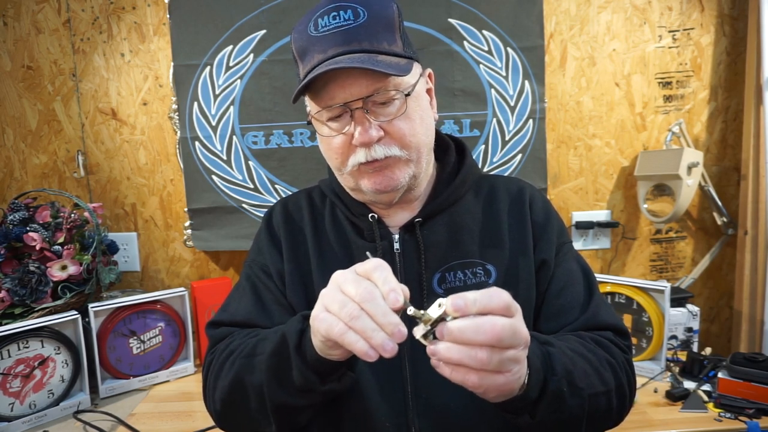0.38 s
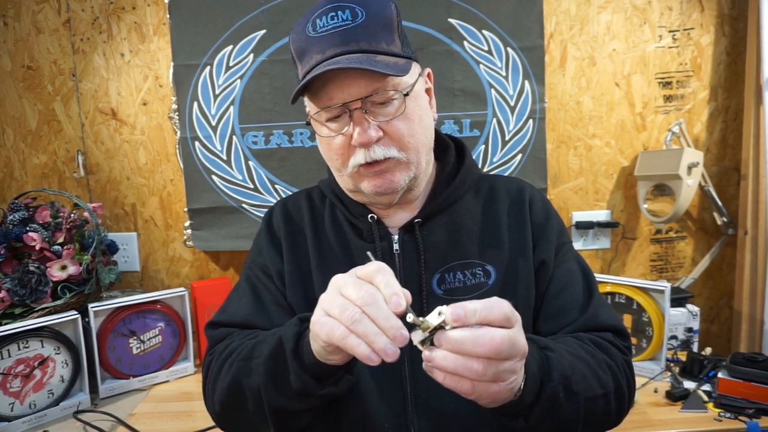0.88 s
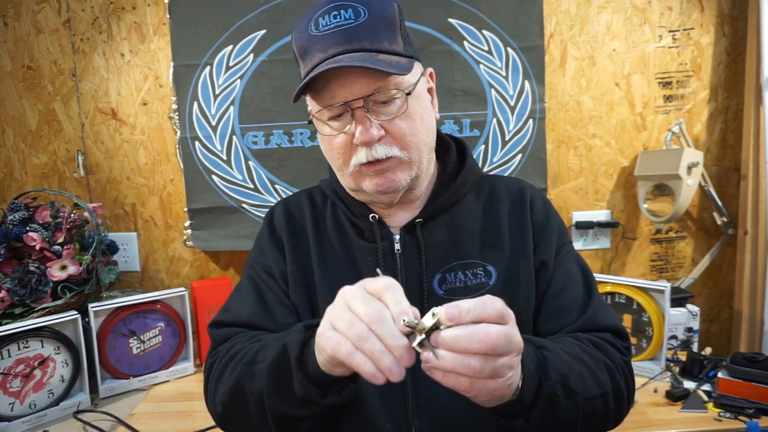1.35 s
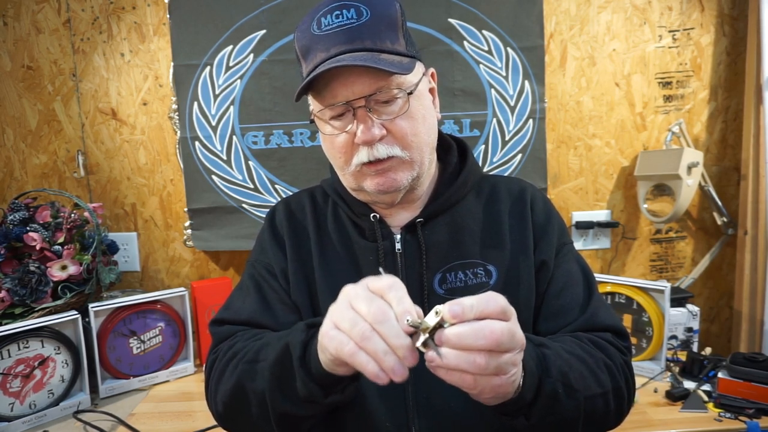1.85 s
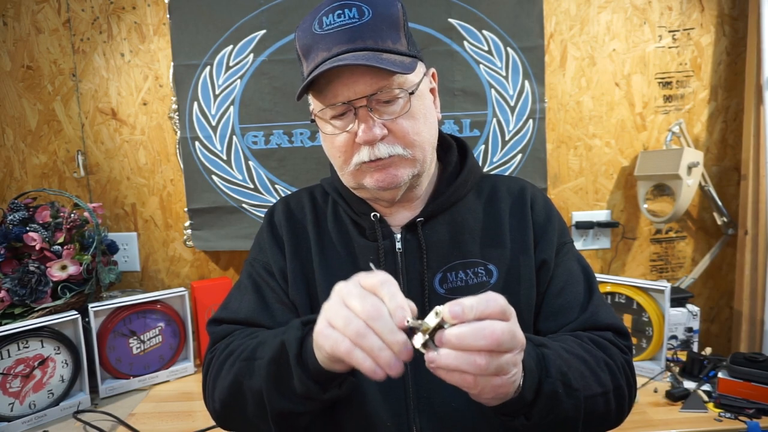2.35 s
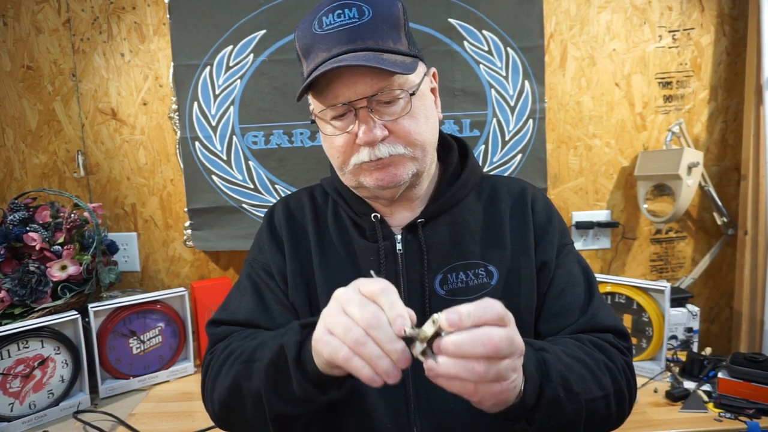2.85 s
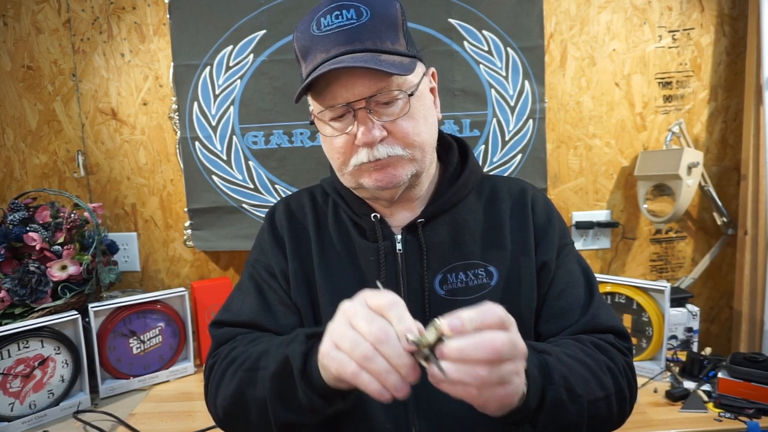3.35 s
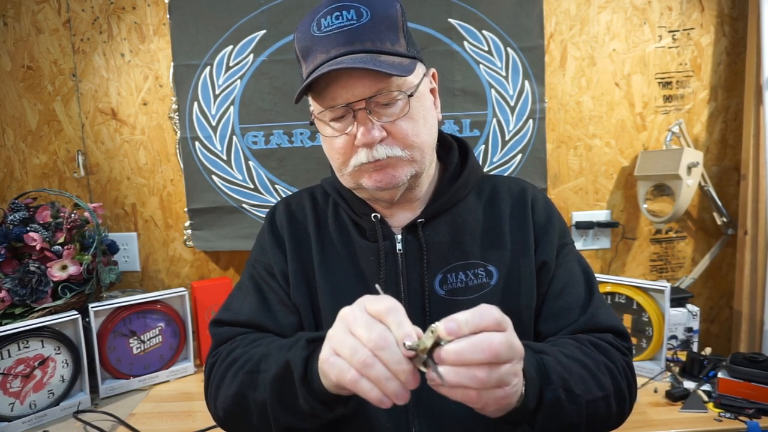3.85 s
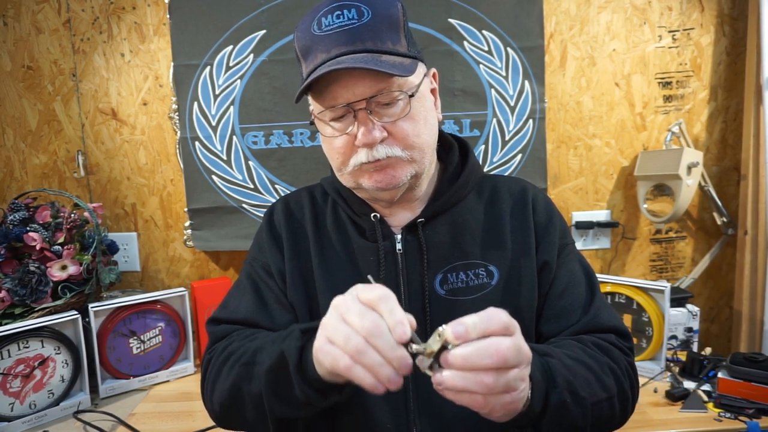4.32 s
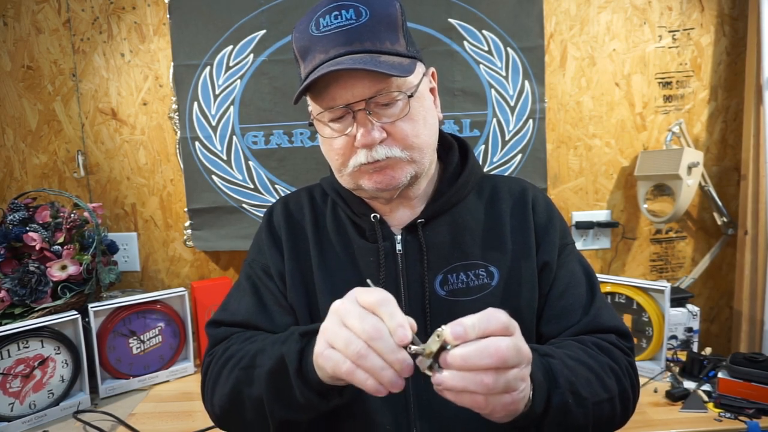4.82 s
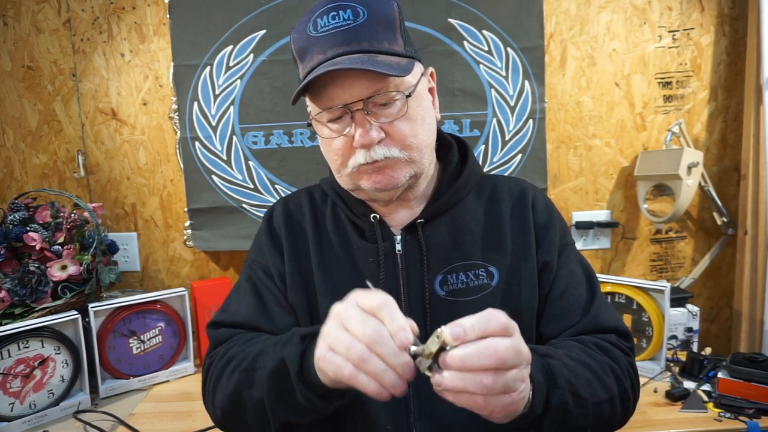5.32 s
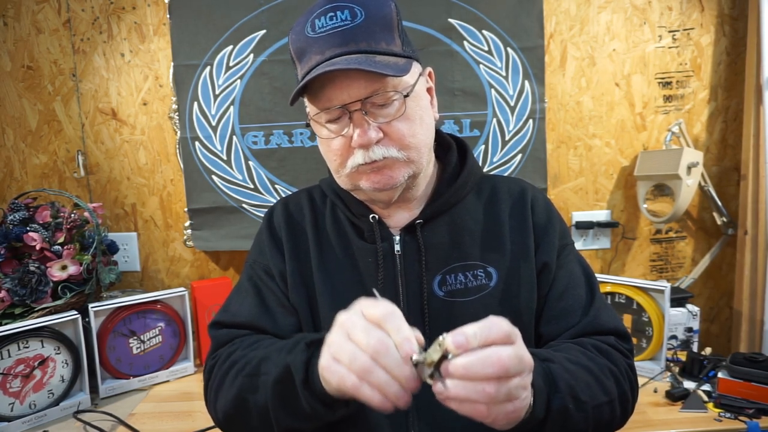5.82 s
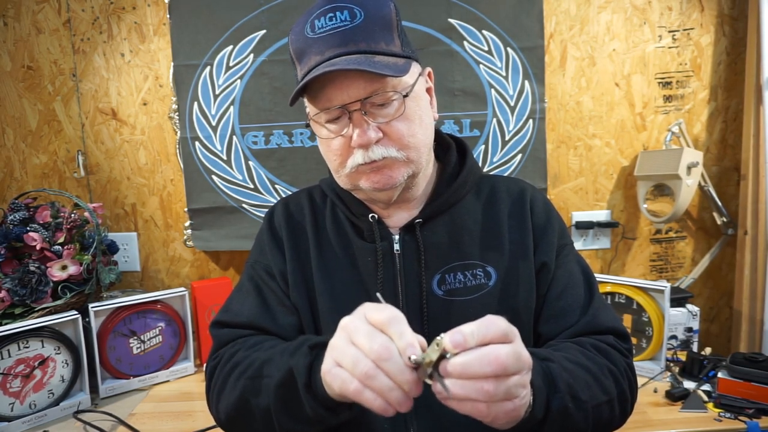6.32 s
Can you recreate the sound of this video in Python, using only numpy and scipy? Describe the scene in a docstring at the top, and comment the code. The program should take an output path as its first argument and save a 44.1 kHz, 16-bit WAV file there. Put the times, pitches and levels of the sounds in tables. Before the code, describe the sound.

A fine steel file works on a small metal contact held in the hand, heard close and mostly on the right, with a short wooden workshop reverberation. At 0.1 s a single scratchy stroke bites with sharp ticks; a faint touch follows at 0.25, then near quiet until light contact at 0.9. From 1.0 s quick, even pull and push strokes run at about seven a second, dry, bright and gritty, each about a tenth of a second or less. They pause around 3.4-3.7 s with tiny clicks, then resume a little stronger until the end at about 6.6 s. Brief high squeaks ring at 2.5 and 3.2 s and crowd in after 3.8, piercing near 5.3, 5.55 and 5.9. A soft sleeve drag and dull thump come at 5.7; the strongest rasp is at 6.1. Faint hiss, room air, low buzz and distant motor hum continue underneath.

```python
"""Filing small metal parts

A fine steel file rasps in quick push and pull strokes over small metal contacts held in the hand, in a plywood
workshop. Dense random clicks excite scratch, blade and contact resonances; slips add a squealing tone with its octave.
Dying noise bursts tick and knock: sharp bites as strokes begin, light touches, one thump. A sleeve drags once.
The right microphone is much nearer than the left. Shaped noise makes hiss and room air, sines make a far motor
and the recorder's frame-rate buzz."""
import sys
import numpy as np
from scipy import signal
from scipy.fft import rfft, irfft, next_fast_len
from scipy.io import wavfile
from scipy.ndimage import map_coordinates

SR = 44100
rng = np.random.default_rng(int(sys.argv[2]) if len(sys.argv) > 2 else 0)


def persist_wave(psi):
    """Save psi, clipped to +-1, as 16-bit WAV."""
    counts = np.round(np.clip(psi, -1, 1) * 32767).astype(np.int16)
    wavfile.write(sys.argv[1], SR, np.atleast_2d(counts).T)


def field_ratio(decibels):
    """Amplitude ratio for a level in dB (20 dB per decade); scalars and array-likes work."""
    return 10 ** (np.asarray(decibels, dtype=float) / 20)


N = 294588  # samples in the scene


def unit(x):
    """Scale to rms 1."""
    return x / np.sqrt(np.mean(x ** 2) + 1e-20)


def along(points, hz):
    """Interpolate (frequency_hz, value) points on a log frequency axis."""
    f, v = np.transpose(points)
    return np.interp(np.log(hz + 1), np.log(f + 1), v)


def filtered(x, response):
    """Multiply the spectrum of x by a response, real or complex, given as a function of frequency."""
    n = x.shape[-1]
    padded = next_fast_len(n + 4096)
    hz = np.fft.rfftfreq(padded, 1 / SR)
    return irfft(rfft(x, padded) * response(hz), padded)[..., :n]


def wobble(n, rate):
    """A smooth random curve over n samples, with rate knots a second."""
    knots = rng.standard_normal(int(n * rate / SR) + 4)
    return map_coordinates(knots, [np.arange(n) * rate / SR])


def resonant(x, modes, detune, scatter_db):
    """Ring x through modes; as the contact point travels, each is driven now harder, now softer."""
    hz, width, db = np.transpose(modes)[..., None]
    hz = hz * (1 + detune * rng.standard_normal(hz.shape))
    travel = np.array([wobble(len(x), 33.7) for _ in modes])
    drive = x * field_ratio(db + scatter_db * travel)
    rings = filtered(drive, lambda f: 1j * f * width / (hz * hz - f * f + 1j * f * width))
    signs = (-1.) ** np.arange(len(modes))  # neighbouring modes add in opposite polarity
    return signs @ rings


def swell(t, peak, rise, fall, edge_db, curve):
    """Gain 1 at the peak, edge_db down one rise before and one fall after; a higher curve is flatter on top."""
    distance = np.abs(np.where(t < peak, (peak - t) / rise, (t - peak) / fall))
    return field_ratio(-edge_db * distance ** curve)


def add(track, s, x):
    """Mix x into the track from s seconds, trimming whatever falls outside."""
    at = round(s * SR)
    part = track[max(at, 0):][:len(x) + min(at, 0)]
    part += x[max(-at, 0):][:len(part)]


def grains(n, spiky_db):
    """Dense friction noise: every sample is a click scaled by a random size, capped so none towers."""
    size = np.minimum(rng.exponential(size=n), 5)
    return unit(rng.standard_normal(n) * field_ratio(spiky_db * size))


def tone(hz, db, lag=0):
    """A steady sine of db rms, lag in radians."""
    t = np.arange(N) / SR
    return np.sqrt(2) * field_ratio(db) * np.cos(2 * np.pi * hz * t + lag)


# Hiss spectrum, shape only: frequency_hz, density_db (relative, per Hz)
HISS_SPECTRUM = [(10, 13), (30, 10), (80, 5), (300, -2.5), (1500, -9), (4000, -4), (11000, -4.5)]


def recorder_hiss():
    """Noise unrelated in the two channels, shaped like the recorder's hiss."""
    hiss = filtered(rng.standard_normal((2, N)), lambda hz: field_ratio(along(HISS_SPECTRUM, hz)))
    return field_ratio(-47) * unit(hiss)


# Room air spectrum, shape only: frequency_hz, density_db (relative, per Hz)
AIR_SPECTRUM = [(40, -12), (120, -3), (250, -5), (440, -0.5), (800, -3), (1500, -7), (3000, -16.5),
                (6000, -42)]


def room_air():
    """Shaped noise, stronger at the right; the left gets a little of it and a noise of its own."""
    noise = rng.standard_normal((2, N))
    near, far = unit(filtered(noise, lambda hz: field_ratio(along(AIR_SPECTRUM, hz))))
    return field_ratio(-47) * np.array([field_ratio(-18.5) * near + field_ratio(-10) * far, near])


# Far motor's tones: pitch_hz, level_db (rms before the channel gains)
MOTOR_TONES = [(147.4, -69), (294.5, -70.5), (442, -64)]


def far_motor():
    """Steady tones whose levels wander separately, 6 dB down at the left and 3 dB up at the right."""
    motor = sum(tone(hz, db) * field_ratio(2.8 * wobble(N, 2.87)) for hz, db in MOTOR_TONES)
    return motor * field_ratio([[-6], [3]])


# Frame buzz: multiple (of the frame rate), level_db (rms)
BUZZ_PARTIALS = [(.5, -73), (1, -47), (2, -54), (3, -63), (4, -65), (5, -86), (6, -72)]


def frame_buzz():
    """Partials of the frame rate, common to both channels; phase lags smear each pulse in time."""
    frame_hz, smear_rad = 29.97, .93  # the lag grows with the squared multiple
    return -sum(tone(k * frame_hz, db, lag=smear_rad * k * k) for k, db in BUZZ_PARTIALS)


# Workshop decay: frequency_hz, t60_s
SHOP_DECAY = [(300, 0.36), (2000, 0.76), (6000, 0.39), (11000, 0.24)]


def workshop(x):
    """The walls answer each quarter second with a new noise tail per microphone; each frequency dies at its own speed."""
    out, step = np.zeros((2, N + SR)), SR // 4
    for start in range(0, N, step):
        noise = rng.standard_normal((2, SR // 3))
        hz, t, spectrum = signal.stft(noise, SR, nperseg=256)
        decay = field_ratio(-60 * t / along(SHOP_DECAY, hz)[:, None])
        tail = signal.istft(spectrum * decay, SR, nperseg=256)[1]
        tail = tail / np.linalg.norm(tail[0])
        wet = signal.fftconvolve(x[None, start:start + step], tail, axes=1)
        out[:, start:start + wet.shape[1]] += wet
    return out[:, :N]


# Cloth spectrum, shape only: frequency_hz, gain_db
CLOTH_SPECTRUM = [(100, -20), (300, -16), (1000, -8.5), (2500, -18), (4000, -34)]


def sleeve():
    """Cloth drags once as the arm shifts, and snags: shaped friction noise under a swell and a sharp decay."""
    start_s, snag_s, end_s = 5.66, 5.727, 6.0
    cloth = unit(filtered(grains(N, spiky_db=-1), lambda hz: field_ratio(along(CLOTH_SPECTRUM, hz))))
    unevenness_db = 1.5 * wobble(N, 40)
    t = np.arange(N) / SR
    snagged = t > snag_s
    shift = swell(t, snag_s, snag_s - start_s, end_s - snag_s, edge_db=7.5, curve=3.9)
    shift = shift * np.where(snagged, 1, .45)  # softer before the snag
    snag = snagged * field_ratio(2.5 - 60 * np.abs(t - snag_s) / 0.095)  # t60 of 95 ms
    return field_ratio(-41.5 + unevenness_db) * (shift + snag) * cloth


# Resonances of scratched metal, shared by ticks and strokes: centre_hz, width_hz, drive_db
SCRATCH_MODES = [(5630, 570, 2), (6096, 860, 0.5), (7480, 840, -3.5), (8250, 540, -2), (9300, 920, -2.5),
                 (10480, 1560, -6.5)]
# Blade resonances, scaled in pitch and width by each stroke: centre_hz, width_hz, drive_db
BLADE_MODES = [(1061, 305, 0.5), (1186, 244, 2), (1670, 71, -8), (2224, 280, -7.5)]
# Broad resonances of the held contact: centre_hz, width_hz, drive_db
CONTACT_MODES = [(2830, 410, -6), (2956, 495, -1), (3650, 1240, -1)]
# Ticks and knocks of file on metal: sharp bites as strokes begin, light touches, one thump:
# start_s, strength_db (trimmed as they play), knock_db (over the tick)
TICKS_PLAYED = [(0.084, -14, -24), (0.093, -10, -19), (0.104, -18, -25), (0.2665, -31.5, -30),
                (0.2623, -21, -35), (0.616, -38, -22), (0.8918, -32, -16), (0.9702, -30, -22),
                (1.02, -24.5, -7.5), (1.065, -12.5, -25), (1.3123, -22.5, -28), (1.769, -21, -33),
                (2.2986, -20.5, -12), (2.736, -32, -17), (2.8607, -23, -21), (3.3111, -16, -10.5),
                (3.4835, -30, -18), (3.6442, -26, -9.5), (3.7199, -27.5, -8), (4.0233, -28.5, -1.5),
                (4.308, -19, -13), (4.5685, -28, -10), (5.106, -27, -4), (5.253, -25, -10),
                (5.725, -30.5, 7.5), (5.829, -21, -30), (5.916, -21, -29), (6.176, -24, -17),
                (6.3255, -32, -22), (6.452, -32, -20), (6.468, -22, -25), (6.492, -22, -28),
                (6.6066, -31, -37)]


def ticks_and_knocks():
    """Brief contact: dying noise through the metal's modes makes a tick, through the blade's a knock."""
    out, t = np.zeros(N), np.arange(SR // 20) / SR
    metal = SCRATCH_MODES + CONTACT_MODES
    for start, db, knock_db in TICKS_PLAYED:
        tick = unit(resonant(rng.standard_normal(len(t)), metal, detune=0.0058, scatter_db=3.5))
        tick = tick * field_ratio(-60 * t / 0.037)
        knock = unit(resonant(rng.standard_normal(len(t)), BLADE_MODES, detune=0.015, scatter_db=-1))
        knock = knock * field_ratio(knock_db - 60 * t / 0.16)
        add(out, start, field_ratio(db - 8.5) * (tick + knock))
    return out


# The file's lightly damped mode, driven harder or softer by each stroke: centre_hz, width_hz, drive_db
RING_MODE = [(4700, 24, 3)]
# Squeals: peak_s, level_db (of the tone, before roughness), pitch_hz, length_s (between points 6 dB down)
SQUEALS_PLAYED = [(0.093, -32.5, 3240, 0.017), (1.055, -34, 4650, 0.017), (1.213, -33.5, 4680, 0.012),
                  (1.478, -36, 4810, 0.017), (1.786, -35, 4700, 0.047), (2.486, -31, 4870, .015),
                  (2.499, -28, 3620, .012), (2.5, -18.5, 4666, 0.0067), (2.872, -33.5, 4940, .015),
                  (2.894, -33, 5020, 0.03), (3.055, -36, 3650, 0.024), (3.167, -31.5, 4840, 0.018),
                  (3.2, -39, 4750, 0.028), (3.227, -21.5, 4680, 0.021), (3.742, -29.5, 4850, 0.0092),
                  (3.809, -26, 4685, 0.025), (4.096, -34, 4690, .026), (4.119, -23, 4683, .027),
                  (4.312, -23, 4700, 0.017), (4.345, -24, 4700, 0.036), (4.373, -24, 4696, 0.028),
                  (4.591, -29.5, 4740, 0.025), (4.616, -32, 4700, 0.023), (4.641, -20, 4703, 0.02),
                  (4.846, -35, 4730, .013), (4.905, -29.5, 4690, .024), (5.12, -33, 4920, 0.0087),
                  (5.188, -31.5, 4740, .019), (5.286, -26.5, 4704, .013), (5.311, -16, 4640, 0.0063),
                  (5.312, -17.5, 9280, 0.0079), (5.316, -41, 3760, 0.021), (5.464, -38, 4800, 0.012),
                  (5.536, -26.5, 4560, 0.02), (5.539, -27.5, 9120, 0.02), (5.561, -38, 1610, 0.021),
                  (5.562, -18, 4470, 0.019), (5.579, -24, 4570, 0.015), (5.716, -35, 3120, 0.0099),
                  (5.738, -32.5, 4720, 0.02), (5.919, -16, 4640, 0.0075), (5.932, -20.5, 4630, 0.01),
                  (5.948, -32, 4720, .008), (5.973, -36.5, 1160, 0.02), (5.977, -22, 4756, 0.023),
                  (6.188, -27, 4830, 0.016), (6.254, -25, 4705, 0.016), (6.104, -33.5, 3600, .03),
                  (6.383, -34.5, 3650, 0.021), (6.632, -33.5, 3550, .02), (6.37, -24, 4670, .012),
                  (6.459, -29, 4770, 0.012), (6.61, -33, 4560, 0.0082), (6.631, -19, 4550, 0.018),
                  (6.65, -23.5, 4520, 0.013)]


def squeals():
    """Stick-slip locks onto a mode of the file; its lopsided cycle adds the octave, and the released mode rings
    on."""
    out, t = np.zeros(N), np.arange(SR // 4) / SR
    peak_s, rough_db = .06, 2.2
    ring_span_hz = 500  # squeals further than this from the ringing mode are gritty and stop dead
    firm_db, octave_grows = -22.5, 0.41  # a firm squeal; octave dB gained for each dB above it
    octave_hz, octave_width_hz, octave_peak_db = 9300, 160, -5  # an upper mode lifts octaves near it
    # one unsteady vibration runs through all squeals
    clock = np.cumsum(1 + .003 * (wobble(N + SR, 40) + wobble(N + SR, 300))) / SR
    after = np.clip(t - peak_s, 0, None)
    ring = field_ratio(-9 - 60 * after / .22) * (1 - np.exp(-after / .03))  # fades in, t60 0.22 s
    for at, db, hz, length in SQUEALS_PLAYED:
        phase = 2 * np.pi * hz * clock[round(at * SR):][:len(t)]
        hold = swell(t, peak_s, length / 2, length / 2, edge_db=6, curve=1.53)
        grip = hold * field_ratio(rough_db * wobble(len(t), 299))
        rings = abs(hz - RING_MODE[0][0]) < ring_span_hz
        # passing teeth roughen each cycle and spread the tone
        grit = 1 + 0.21 * wobble(len(t), 2000) + (not rings) * 0.82 * wobble(len(t), 501)
        off_mode = (2 * hz - octave_hz) / octave_width_hz
        octave_db = octave_peak_db + octave_grows * (db - firm_db) - off_mode ** 2
        octave = field_ratio(octave_db) * hold ** 0.81 * np.cos(2 * phase)
        slip = grit * grip * (np.sin(phase) - octave)
        release = rings * ring * field_ratio(rough_db * wobble(len(t), 70)) * np.sin(phase)
        add(out, at - peak_s, np.sqrt(2) * field_ratio(db) * (slip - release))
    return out


# Strokes, pull and push in turn, a pull first:
# start_s (7.5 dB under the peak), time_to_peak_s, length_s (between points 7.5 dB down), scratch_db
STROKES_PLAYED = [(0, 0.079, 0.12, -29), (.228, 0.01, .047, -44), (.914, .0074, .031, -40),
                  (1.024, 0.055, 0.077, -30), (1.155, .058, 0.079, -33.5), (1.318, 0.054, .081, -28),
                  (1.464, 0.051, 0.084, -29), (1.607, 0.055, 0.086, -30.5), (1.749, 0.031, 0.071, -29.5),
                  (1.893, .052, 0.077, -33.5), (2.029, 0.057, .091, -36.5), (2.173, 0.041, 0.074, -30),
                  (2.298, 0.053, 0.083, -32.5), (2.456, .043, .064, -30), (2.592, 0.035, 0.078, -38),
                  (2.746, 0.035, .058, -30.5), (2.85, 0.03, 0.089, -36), (3.028, 0.028, 0.05, -28),
                  (3.149, .079, 0.099, -28), (3.31, 0.052, 0.077, -25), (3.738, .044, 0.085, -27.5),
                  (3.884, 0.049, 0.067, -26), (4.048, 0.046, .086, -28), (4.178, 0.043, 0.071, -25.5),
                  (4.303, 0.049, 0.081, -25.5), (4.443, .045, .073, -26), (4.576, 0.038, 0.079, -26),
                  (4.714, .051, 0.072, -27), (4.842, .048, 0.081, -29.5), (4.986, 0.031, .068, -29),
                  (5.11, .047, 0.083, -27), (5.26, .045, 0.076, -28), (5.369, 0.063, .094, -29.5),
                  (5.518, 0.031, 0.065, -24.5), (5.637, 0.059, 0.1, -28.5), (5.807, .024, 0.062, -29.5),
                  (5.914, 0.019, 0.083, -28.5), (6.065, 0.039, 0.063, -21), (6.169, 0.054, 0.093, -29),
                  (6.323, 0.05, .075, -31), (6.446, 0.039, 0.078, -35.5), (6.614, .034, 0.043, -28.5)]


def rasp():
    """Each stroke bites, swells with hand speed and shakes blade and contact, which ring on a moment."""
    # pairs are (pull, push)
    flatness = (2.9, 2.15)  # the pull holds its speed, the push peaks
    ring_db = (2, -6)  # the pull rings the file's mode more
    blade_bend, blade_damp = (1.023, .97), (0.73, 1)  # pitch factor (the pull stiffens), width factor
    blade_over_db, contact_over_db = (-9, -10), (-11, -7)  # over the scratch of an ordinary stroke
    usual_db = -29  # scratch level of an ordinary stroke
    blade_lag, contact_lag = 0.41, 0.42  # dB lost against the scratch for each dB of harder stroke
    out, lead_s = np.zeros(N), .02
    t = np.arange(SR // 4) / SR - lead_s
    for k, (start, peak, length, db) in enumerate(STROKES_PLAYED):
        way = k % 2  # 0 pull, 1 push
        bite = np.clip((t + 0.029) / 0.025, 0, 1) ** 2
        speed = swell(t, peak, peak, length - peak, edge_db=7.5, curve=flatness[way])
        # pressure flutters as teeth skip
        pressure = field_ratio(1.27 * wobble(len(t), 56.2) + 0.9 * wobble(len(t), 260.5))
        drive = bite * speed * pressure
        catch = drive * grains(len(t), spiky_db=3)  # the same teeth drive every part
        ring = np.add(RING_MODE, [0, 0, ring_db[way]])
        blade = np.multiply(BLADE_MODES, [blade_bend[way], blade_damp[way], 1])
        harder_db = db - usual_db
        blade_db = blade_over_db[way] - blade_lag * harder_db
        contact_db = contact_over_db[way] - contact_lag * harder_db
        # modes, detune, level over the scratch in dB
        parts = [([*ring, *SCRATCH_MODES], .006, 0), (blade, .02, blade_db), (CONTACT_MODES, .02, contact_db)]
        sound = 0
        for modes, detune, over_db in parts:
            sound = sound + field_ratio(over_db) * unit(resonant(catch, modes, detune, scatter_db=2))
        add(out, start - lead_s, field_ratio(db) * np.sqrt(np.mean(drive ** 2)) * sound)
    return out


# Direct sound at the left microphone: frequency_hz, gain_db
LEFT_SHADE = [(500, -9.5), (1200, -10.5), (2500, -11), (4700, -12), (8000, -10), (11000, -10.5)]


def scene():
    """The work is close to the right microphone; the left hears it shaded, and the workshop answers both."""
    work = rasp() + squeals() + ticks_and_knocks() + sleeve()
    left = filtered(work, lambda hz: field_ratio(along(LEFT_SHADE, hz)))
    direct = np.array([left, field_ratio(4) * work])
    room = field_ratio([[-14], [-11]]) * workshop(work)
    background = recorder_hiss() + room_air() + far_motor() + frame_buzz()
    return direct + room + background


# Steep top cut: frequency_hz, gain_db
TOP_CUT = [(11010, 0), (11040, -30), (11150, -60), (12300, -80)]


def cut_top(x):
    """A steep filter removes everything above 11 kHz."""
    return filtered(x, lambda hz: field_ratio(along(TOP_CUT, hz)))


def low_pass(x):
    """Removes everything above the highest recorded frequency."""
    return signal.sosfilt(signal.butter(12, 12230, fs=SR, output="sos"), x)


def record(dry):
    """Peaks are limited to full scale, then a steep filter removes everything above 11 kHz."""
    limited = np.clip(dry, -1, 1)
    mix = cut_top(limited)
    return low_pass(mix)


dry = scene()
out = record(dry)
persist_wave(out)
```